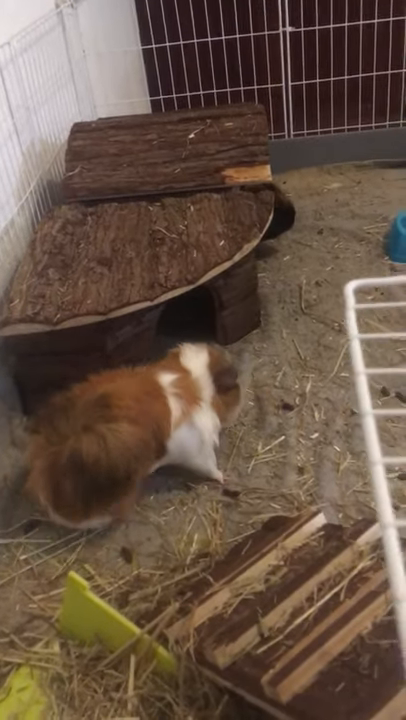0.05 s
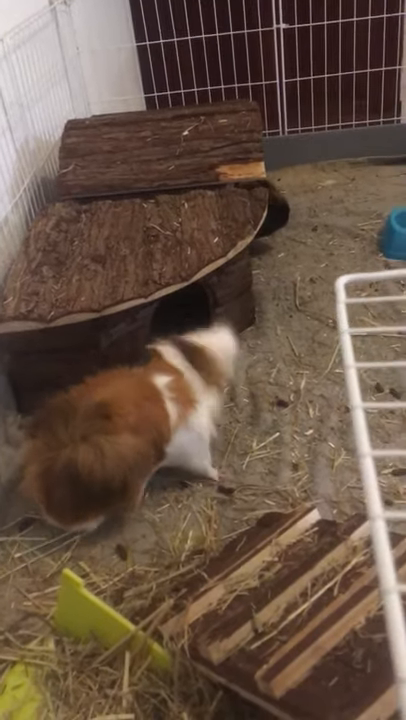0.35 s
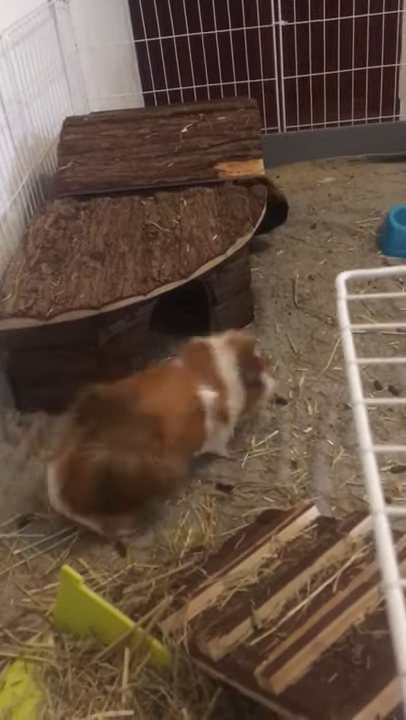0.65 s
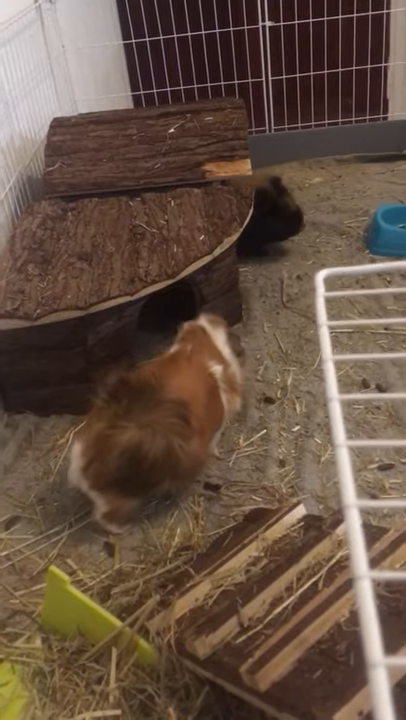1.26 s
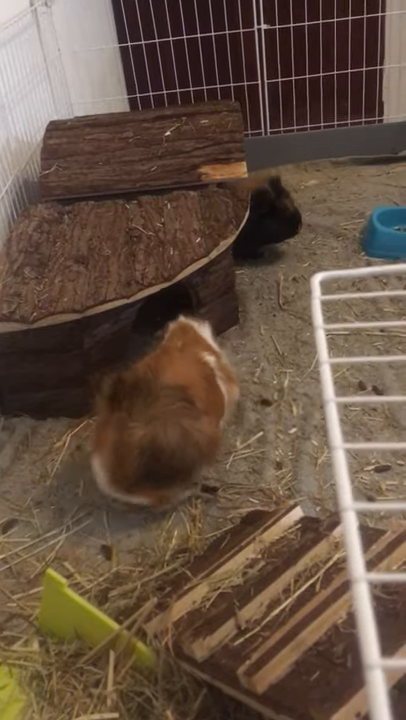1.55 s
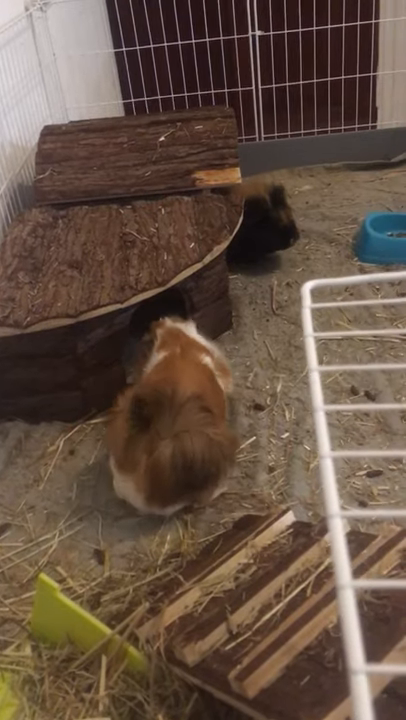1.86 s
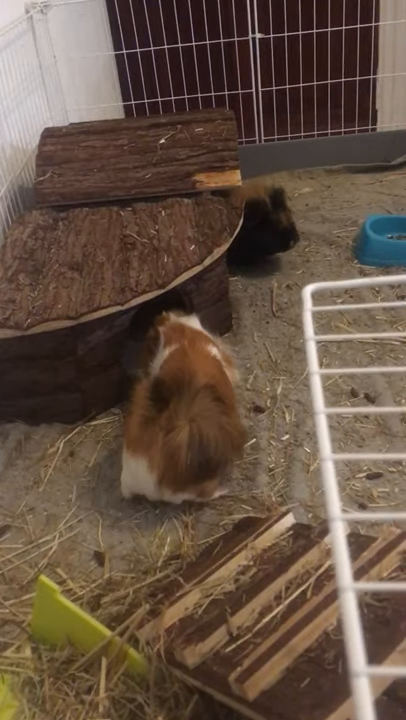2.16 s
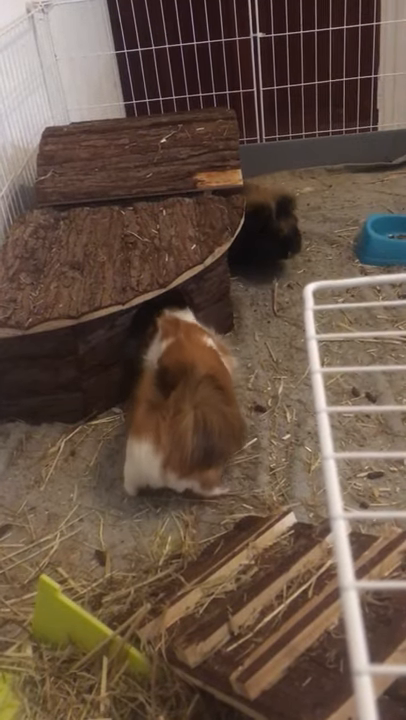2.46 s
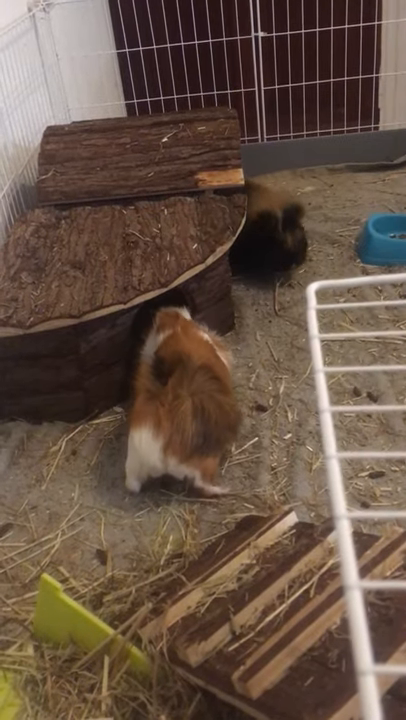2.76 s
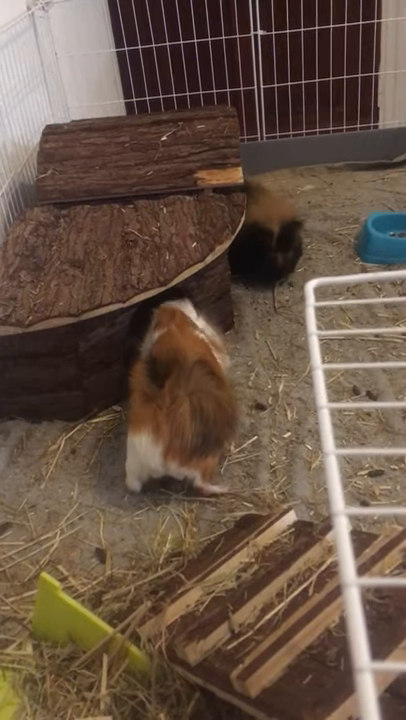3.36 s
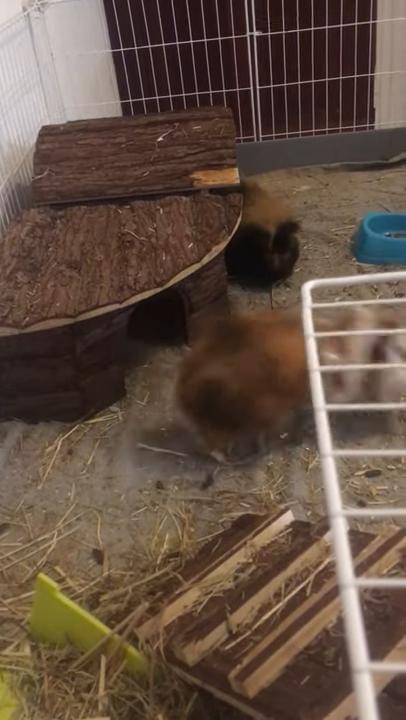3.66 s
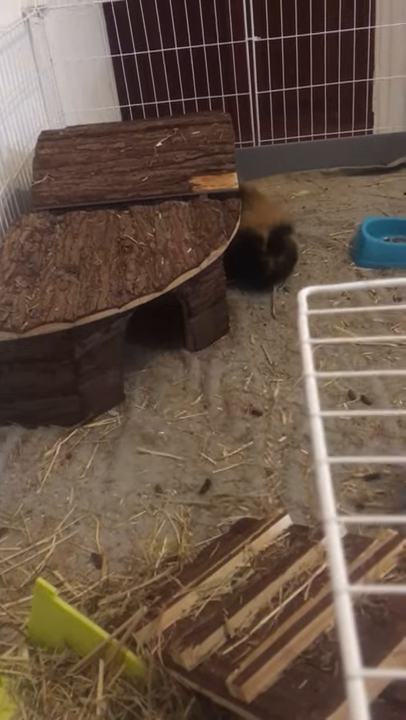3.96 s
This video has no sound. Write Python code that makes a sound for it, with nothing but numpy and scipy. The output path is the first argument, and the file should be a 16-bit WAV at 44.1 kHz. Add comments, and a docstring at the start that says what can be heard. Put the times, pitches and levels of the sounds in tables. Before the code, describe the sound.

Guinea pig footsteps in a small room, with the microphone over the pen: a soft thumping hop, quiet shuffling with brief clucks, then a louder scurry of thumps, clicks and rustling hay over faint rumble and hiss.

```python
"""Over a faint rumble and hiss, paws thump as a guinea pig hops in a hay-strewn indoor pen.
The animals shuffle about and murmur softly, then one darts away and bumps something hollow.
Each paw bends the covered floor and makes the small room boom at its own low notes.
Claws knock, dry straws snap, and fur and feet rustle through the hay."""
import sys
import numpy as np
from scipy import signal
from scipy.fft import rfft, irfft, next_fast_len
from scipy.io import wavfile
from scipy.ndimage import map_coordinates

SR = 44100
rng = np.random.default_rng(int(sys.argv[2]) if len(sys.argv) > 2 else 0)


def persist_wave(psi):
    """Save psi, clipped to +-1, as 16-bit WAV."""
    counts = np.round(np.clip(psi, -1, 1) * 32767).astype(np.int16)
    wavfile.write(sys.argv[1], SR, np.atleast_2d(counts).T)


N = 176400  # 4 seconds


def amp(db):
    """Turn decibels into a number to multiply by."""
    return 10 ** (np.asarray(db) / 20)


def unit(x):
    """Scale a sound to an average strength (rms) of 1."""
    return x / np.sqrt(np.mean(x ** 2) + 1e-20)


def along(points, hz):
    """Read between (frequency, value) points, spacing them by octaves."""
    freqs, values = np.transpose(points)
    return np.interp(np.log(hz + 1), np.log(freqs + 1), values)


def wobble(rate, n):
    """A smooth random curve of n samples that passes rate random values a second."""
    return map_coordinates(rng.standard_normal(4096), [np.arange(n) * rate / SR], mode="wrap")


def add(out, start, x):
    """Mix x into out from a start time in seconds."""
    i = max(0, round(start * SR))
    out[i:i + len(x)] += x[:max(0, N - i)]


def noise(colour):
    """Noise of strength 1, its lows and highs balanced by (frequency, level) points."""
    gain = amp(along(colour, np.fft.rfftfreq(N, 1 / SR)))
    return unit(irfft(rfft(rng.standard_normal(N)) * gain, N))


def swells(rows):
    """A rounded rise and fall in loudness for each (time, length, level) row."""
    out = np.zeros(N)
    for start, length, db in rows:
        add(out, start, amp(db) * np.sqrt(np.abs(np.hanning(int(length * SR)))))
    return out


def click(gain_db):
    """A click of peak 1 whose tone is set by gain_db, a function from Hz to dB."""
    size = 2048
    hz = np.fft.rfftfreq(size, 1 / SR) + 20
    cepstrum = irfft(np.log(amp(gain_db(hz))))
    cepstrum[1:size // 2] *= 2  # folding onto the first half packs the energy at the start
    cepstrum[size // 2:] = 0
    pulse = irfft(np.exp(rfft(cepstrum)))[:size // 2]
    return pulse / np.abs(pulse).max()


def roll_off(ratio):
    """A gain in dB that falls about 12 dB an octave once the frequency ratio passes 1."""
    return -10 * np.log10(1 + np.square(ratio) ** 2)


def in_room(x, room_db):
    """The sound arrives directly, then as two wall echoes and a fading wash of reflections."""
    # tone of the wash (frequency [Hz], level [dB])
    colour = [(40, -18), (100, -9), (170, -6), (290, -0.5), (420, -1), (1000, -5), (2000, -9), (5000, -7.5),
              (12000, 0.5)]
    # how long the wash lasts (frequency [Hz], time to fade by 60 dB [s])
    fade_times = [(100, 0.42), (260, 0.42), (700, 0.47), (1840, 0.42), (4850, 0.44), (12000, 0.21)]
    # bounces off the walls (delay [s], relative level [dB])
    echoes = [(.009, -11.5), (0.017, -19.5)]
    wall_db = -4
    hz, t, bands = signal.stft(rng.standard_normal(SR * 2 // 3), SR, nperseg=256)
    fade = amp(along(colour, hz)[:, None] - 60 * t / along(fade_times, hz)[:, None])
    response = signal.istft(bands * fade, SR, nperseg=256)[1]
    response *= 1 - np.exp(-np.arange(len(response)) / SR / 0.001)  # soft start
    response *= amp(room_db) / np.linalg.norm(response)
    response[0] += 1  # the direct sound
    for delay, db in echoes:
        response[round(delay * SR)] += amp(db + wall_db + room_db)
    return signal.fftconvolve(x, response)


def background():
    """The room rumbles, the microphone hisses and a faint hum wavers."""
    # tone of the rumble and hiss (frequency [Hz], relative level [dB])
    colour = [(15, -56), (25, -32.5), (37, 2.5), (53, 2), (70, -5.5), (86, -5), (137, -1.5), (170, -6.5),
              (216, -8.5), (241, -8.5), (333, -15.5), (361, -12.5), (437, -16.5), (542, -17.5), (710, -19),
              (955, -24.5), (1040, -23), (1780, -27), (2590, -25.5), (4950, -29), (8970, -26),
              (12100, -27.5), (15800, -33)]
    # notes of the hum (pitch [Hz], level [dB])
    hum_notes = [(47.5, -73), (99.5, -70.5), (338, -79.5), (436, -82), (2540, -87.5)]
    noise_db, drift = -63.5, 0.0063
    hum = np.zeros(N)
    for hz, db in hum_notes:
        pitch = hz * (1 + drift * wobble(60, N))
        hum += amp(db) * np.sqrt(2) * np.sin(2 * np.pi * np.cumsum(pitch) / SR)
    return amp(noise_db) * noise(colour) + hum


def rustle():
    """Moving animals brush the hay with a grainy hiss and scuff the floor with a duller one."""
    # fur and feet brushing through hay (time [s], length [s], level [dB])
    brushes = [(.515, 0.063, -58.5), (.63, 0.06, -68.5), (1.595, 0.073, -72.5), (1.655, .06, -66),
               (1.83, .04, -75), (3.38, 0.32, -67), (3.6, 0.56, -60)]
    # tone of the hay (frequency [Hz], relative level [dB])
    hay_colour = [(300, 5), (1200, 3.5), (3000, -0.5), (6000, -5), (12000, -6), (16000, -16)]
    # a body scuffing the floor cover (time [s], length [s], level [dB])
    scuffs = [(.59, 0.13, -58.5), (3.52, 0.086, -48), (3.725, 0.06, -46.5), (3.93, 0.062, -44.5)]
    # tone of the scuffing (frequency [Hz], relative level [dB])
    scuff_colour = [(60, -1), (200, -6), (450, 0), (1050, -10.5), (1600, -18), (4000, -36), (12000, -42)]
    grain_db = 3.5
    hay = unit(noise(hay_colour) * amp(grain_db * wobble(500, N)))
    return hay * swells(brushes) + noise(scuff_colour) * swells(scuffs)


def straw_snaps():
    """Dry straws crack in short, bright bursts of noise."""
    # straws breaking (time [s], level [dB], strongest frequency [Hz], time to fade by 60 dB [s])
    snaps = [(.439, -47.5, 10000, 0.0094), (.5355, -49, 5730, 0.019), (.536, -50, 12800, 0.018),
             (.547, -64, 11300, 0.035), (0.63, -63.5, 8900, .03), (1.622, -64, 11400, 0.13),
             (1.682, -61, 10800, 0.076), (2.583, -59, 7600, 0.03), (3.358, -59, 13000, .015),
             (3.529, -60, 9000, .015), (3.5822, -46, 11100, 0.035), (3.639, -59.5, 11700, 0.06),
             (3.684, -51, 11000, .01), (3.706, -57, 11000, 0.019), (3.763, -49, 5600, 0.016),
             (3.761, -53, 13000, .018), (3.826, -49.5, 11500, 0.056), (3.876, -53, 12400, .025),
             (3.912, -54, 11800, .02)]
    width_octaves, slope_db = 0.58, 16  # how the burst weakens away from its strongest frequency
    out, t = np.zeros(N), np.arange(SR // 10) / SR
    for start, db, centre_hz, fade_s in snaps:
        straw = click(lambda hz: -slope_db * np.hypot(1, np.log2(hz / centre_hz) / width_octaves))
        burst = rng.standard_normal(len(t)) * amp(-60 * t / fade_s)
        crack = signal.fftconvolve(burst, straw / np.linalg.norm(straw))
        add(out, start, in_room(amp(db) * crack, room_db=-9.5))
    return out


def calls(rows, harmonics):
    """Each call glides through three pitches; a quick tremble makes it a little hoarse."""
    pitch_tremble, level_tremble_db = 0.024, 3
    out = np.zeros(N)
    for start, length, db, *pitches in rows:
        progress = np.linspace(0, 1, int(length * SR))
        glide = np.polyval(np.polyfit([0, .5, 1], pitches, 2), progress)
        hz = glide * (1 + pitch_tremble * wobble(454, len(progress)))
        phase = 2 * np.pi * np.cumsum(hz) / SR
        tone = sum(amp(level) * np.sin(k * phase) for k, level in enumerate(harmonics, 1))
        loudness = amp(db + level_tremble_db * wobble(313, len(progress)))
        swell = np.sqrt(np.abs(np.sin(np.pi * progress)))
        add(out, start, in_room(loudness * swell * tone, room_db=-2.5))
    return out


def voices():
    """The guinea pigs murmur, and give soft clucks and whimpers that are nearly pure tones."""
    # murmurs (time [s], length [s], level [dB], start pitch [Hz], middle pitch [Hz], end pitch [Hz])
    murmurs = [(1.208, 0.037, -54, 636, 605, 550), (2.37, 0.025, -63, 633, 570, 536),
               (2.518, 0.056, -53.5, 659, 603, 664), (2.603, 0.041, -60.5, 699, 630, 590)]
    # a murmur's tones at 1, 2, 3 and 4 times its pitch (relative level [dB])
    murmur_harmonics = [-6.5, -3, -16.5, -15]
    # clucks (time [s], length [s], level [dB], start pitch [Hz], middle pitch [Hz], end pitch [Hz])
    clucks = [(.683, .03, -62.5, 940, 900, 880), (.722, 0.031, -63, 887, 910, 850),
              (2.555, 0.133, -67, 660, 610, 570), (2.648, 0.039, -63, 702, 1110, 1370),
              (2.893, 0.022, -63.5, 880, 1000, 1210), (3.02, 0.055, -70.5, 1210, 1260, 980),
              (3.025, 0.051, -66, 658, 570, 493), (3.088, 0.029, -66, 620, 850, 1000),
              (3.353, .028, -59, 835, 1030, 1270), (3.55, 0.028, -56.5, 740, 1150, 1450)]
    # a cluck's tones at 1 and 2 times its pitch (relative level [dB])
    cluck_harmonics = [0, -22]
    return calls(murmurs, murmur_harmonics) + calls(clucks, cluck_harmonics)


def hollow_bump():
    """The fleeing animal bumps something hollow that rings briefly."""
    # the object's own notes (pitch [Hz], relative level [dB], time to fade by 60 dB [s])
    notes = [(425, -8, .03), (600, -2, 0.024), (705, -1.5, 0.025), (1045, -9, 0.029)]
    start_s, bump_db = 3.9208, -26.5
    out, t = np.zeros(N), np.arange(SR // 10) / SR
    ring = sum(amp(db - 60 * t / fade_s) * np.sin(2 * np.pi * hz * t) for hz, db, fade_s in notes)
    add(out, start_s, in_room(amp(bump_db) * ring, room_db=-1.5))
    return out


def claw_knocks():
    """A claw hits the hard floor and the room answers; a second claw and a brief scrape follow."""
    # claws striking (time [s], level [dB], dull above [Hz], room echo [dB])
    knocks = [(.511, -46, 6000, 6), (.6345, -41.5, 3020, 2), (.656, -50.5, 1360, 2.5),
              (3.588, -26.5, 3170, 4), (3.613, -42, 1760, 0), (3.6953, -24.5, 3520, 4.5),
              (3.8304, -16.5, 6200, 7), (3.8395, -30, 4500, -2), (3.855, -29, 694, 1)]
    # tone of a knock (frequency [Hz], relative level [dB])
    colour = [(300, -14.5), (430, -4), (700, -10.5), (1080, -10), (1450, -13.5), (1950, -11.5),
              (2700, -14.5), (3700, -15.5), (4800, -23.5), (7000, -22), (10000, -34), (15800, -44)]
    low_cut_hz = 406
    second_claw_s, second_claw_db = 0.0011, -4
    scrape_fade_s, scrape_db = 0.021, -18.5
    out, t = np.zeros(N), np.arange(SR // 20) / SR
    for start, db, dull_hz, room_db in knocks:
        tap = click(lambda hz: along(colour, hz) + roll_off(hz / dull_hz) + roll_off(low_cut_hz / hz))
        knock = amp(db) * tap
        scrape = amp(scrape_db - 60 * t / scrape_fade_s) * rng.standard_normal(len(t))
        add(out, start, in_room(knock, room_db))
        add(out, start + second_claw_s, amp(second_claw_db) * knock)
        add(out, start, signal.fftconvolve(scrape, knock))
    return out


def paw_thumps():
    """Each paw bends the floor for a swing or two and sets the room's low notes booming."""
    # paws landing (time [s], peak level [dB], pitch [Hz], room echo [dB])
    landings = [(0.4395, -28, 195, -6.5), (0.447, -32.5, 85, -6.5), (.462, -32, 123, -3),
                (0.487, -43, 110, -7), (.634, -37, 242, -6), (0.644, -32, 124, -2.5), (.82, -55.5, 294, -2),
                (0.998, -56, 127, 0), (1.334, -57, 95, 2.5), (1.367, -48.5, 78, -7),
                (1.638, -50.5, 148, -2), (1.686, -54, 186, -1), (1.948, -55.5, 190, 3.5),
                (2.578, -51.5, 84, 3.5), (3.391, -55, 135, 12), (3.45, -49.5, 152, 9),
                (3.529, -46.5, 134, 5), (3.592, -19, 190.5, -3.5), (3.699, -44.5, 160, 13),
                (3.8277, -20, 253, -4.5), (3.838, -24, 186, -3), (3.854, -32.5, 49.7, -10),
                (3.931, -32, 136, -1.5)]
    # the room's own low notes (pitch [Hz], relative level [dB], time to fade by 60 dB [s])
    notes = [(84.3, 3.5, 0.7), (130.4, 8.5, 0.57), (160, 1, 0.29), (195, 7.5, 0.47), (339, 6, 0.19),
             (404, 5.5, 0.54), (540, 4, .4), (650, -7, .4)]
    half_width_cycles, lead_s, boom_db = 0.65, 0.03, -59.5
    out, t = np.zeros(N), np.arange(SR) / SR
    boom = sum(amp(db - 60 * t / fade_s) * np.cos(2 * np.pi * hz * t) for hz, db, fade_s in notes)
    from_peak_s = np.arange(int(2 * lead_s * SR)) / SR - lead_s
    for peak_s, db, hz, room_db in landings:
        cycles = hz * from_peak_s
        thud = -amp(db) * np.cos(2 * np.pi * cycles) * np.exp(-(cycles / half_width_cycles) ** 2)
        add(out, peak_s - lead_s, in_room(thud, room_db))
        add(out, peak_s - lead_s, amp(boom_db + room_db) * signal.fftconvolve(thud, boom))
    return out


def scene():
    """All the sounds meet at one microphone above the pen."""
    animals = voices() + paw_thumps() + claw_knocks() + hollow_bump()
    return (animals + straw_snaps() + rustle() + background())[None]


def record(dry):
    """The recorder drops the deepest bass and the very highest treble."""
    low_cut_hz, top_hz = 38, 15900
    bass_cut = signal.butter(4, low_cut_hz, "highpass", fs=SR, output="sos")
    trimmed = signal.sosfilt(bass_cut, dry)
    size = next_fast_len(N + SR // 2)
    below_top = np.fft.rfftfreq(size, 1 / SR) < top_hz
    return irfft(rfft(trimmed, size) * below_top, size)[..., :N]


dry = scene()
out = record(dry)
persist_wave(out)
```